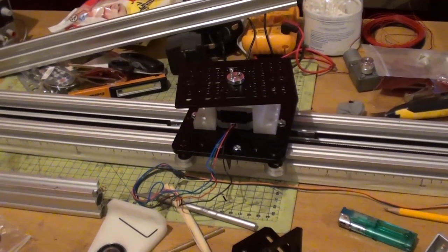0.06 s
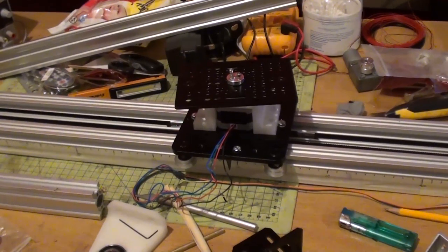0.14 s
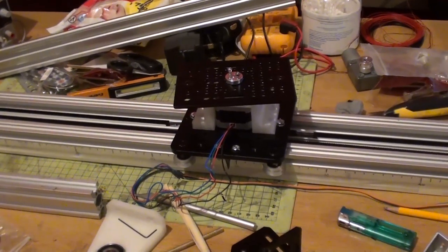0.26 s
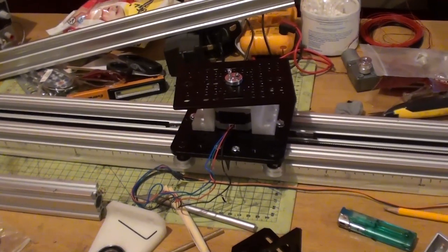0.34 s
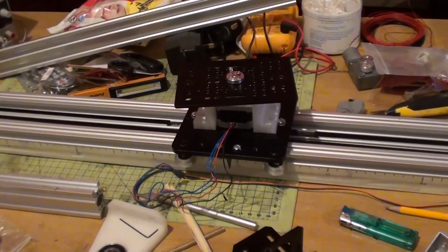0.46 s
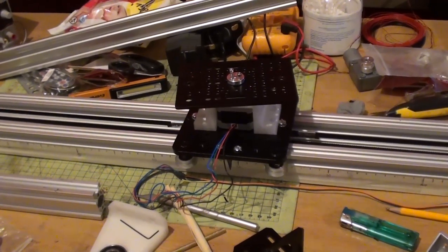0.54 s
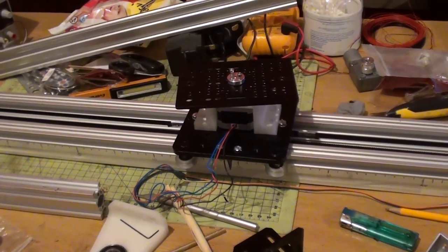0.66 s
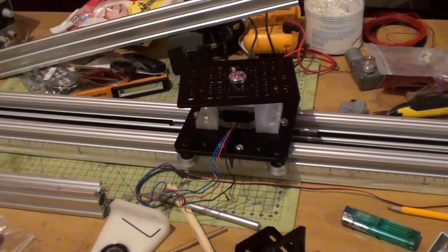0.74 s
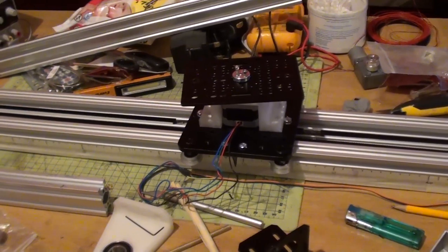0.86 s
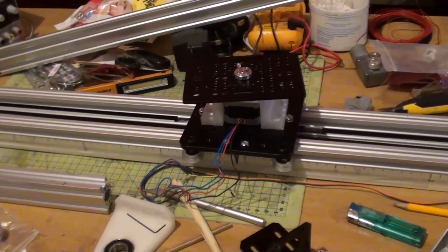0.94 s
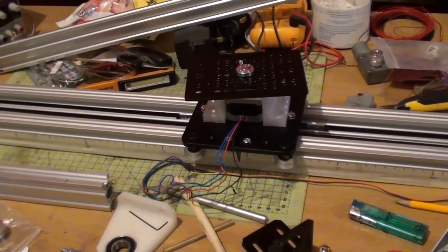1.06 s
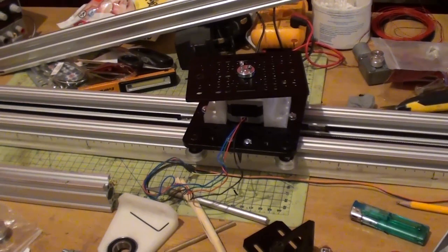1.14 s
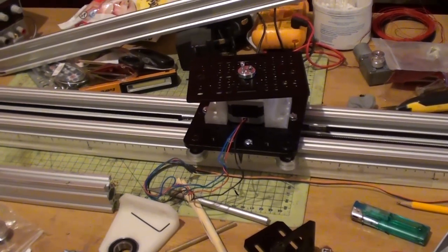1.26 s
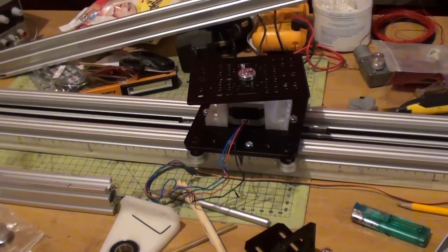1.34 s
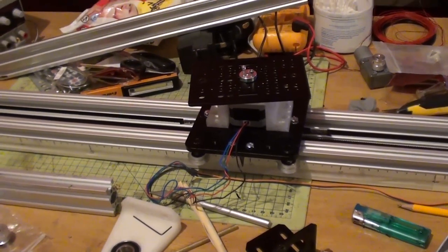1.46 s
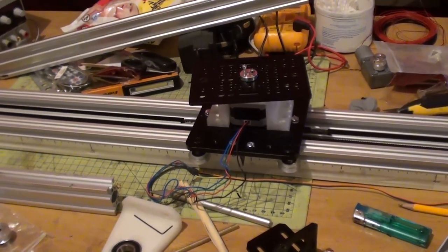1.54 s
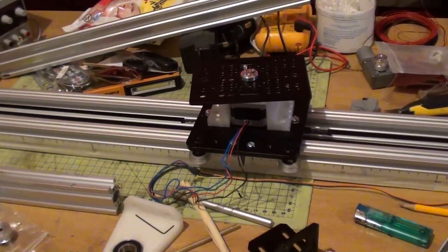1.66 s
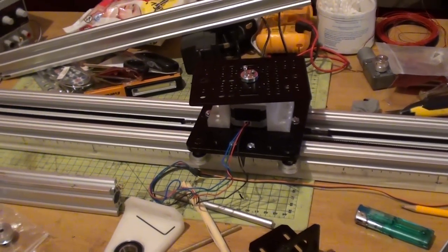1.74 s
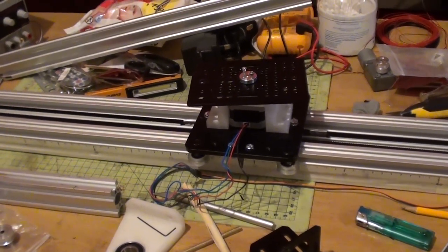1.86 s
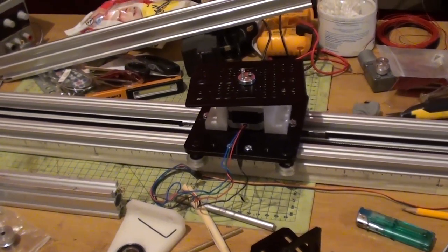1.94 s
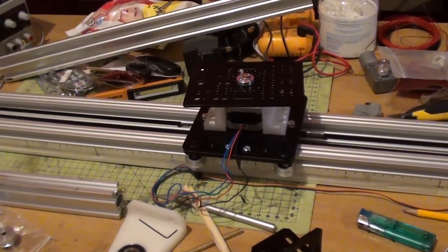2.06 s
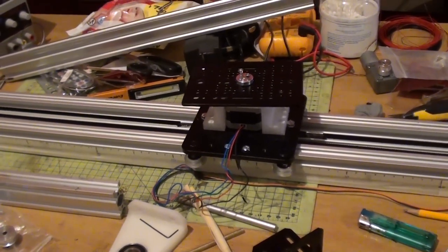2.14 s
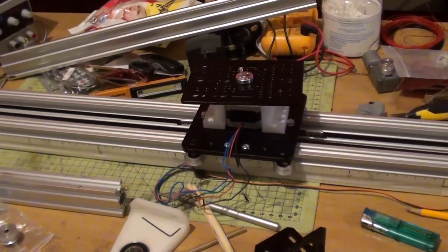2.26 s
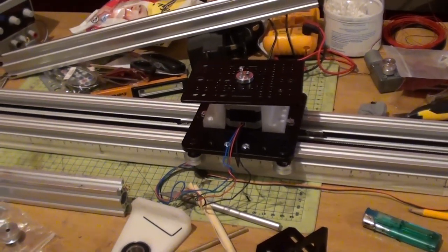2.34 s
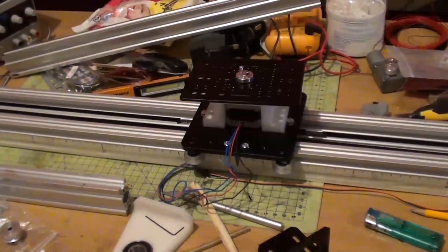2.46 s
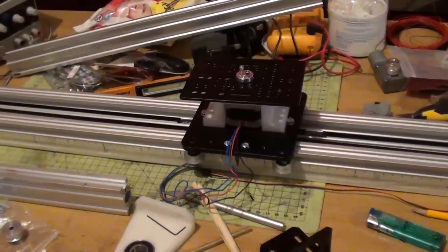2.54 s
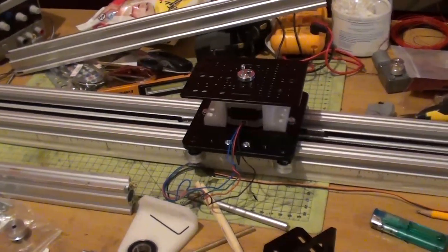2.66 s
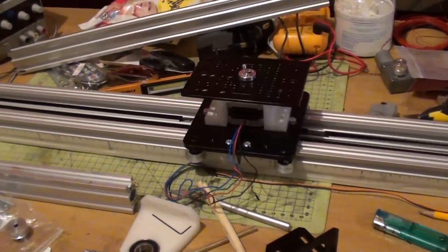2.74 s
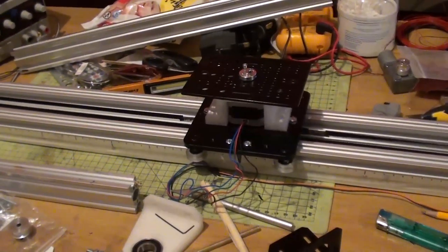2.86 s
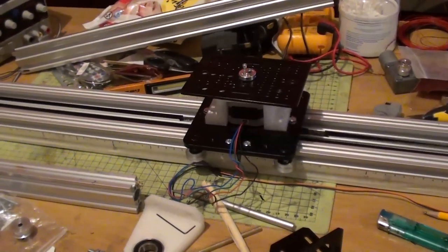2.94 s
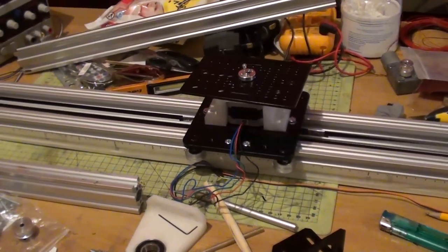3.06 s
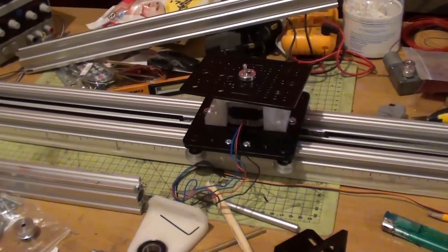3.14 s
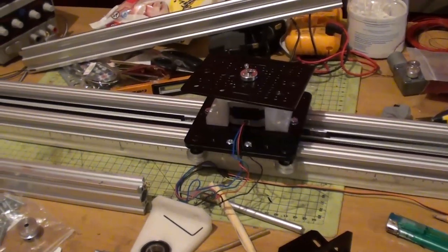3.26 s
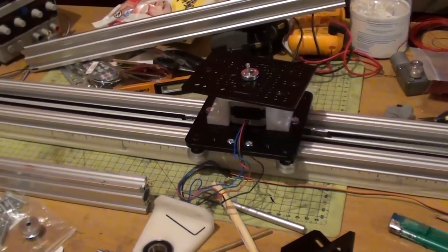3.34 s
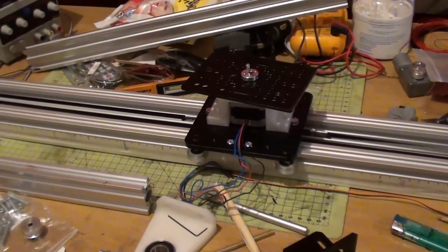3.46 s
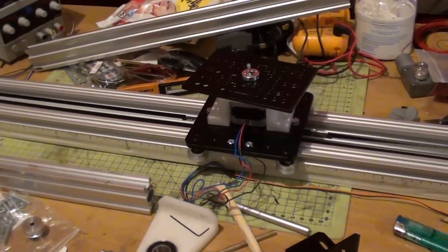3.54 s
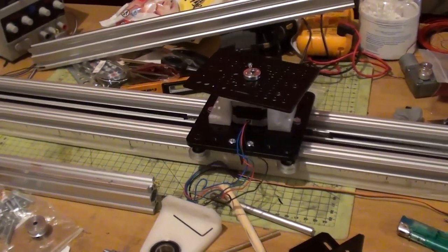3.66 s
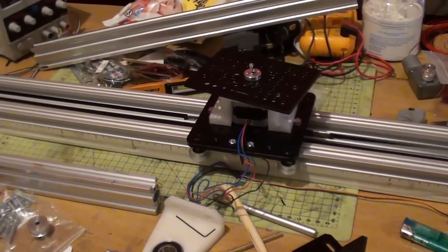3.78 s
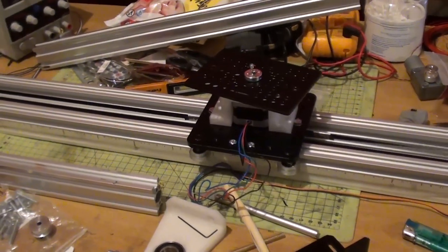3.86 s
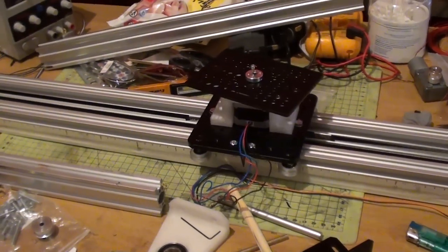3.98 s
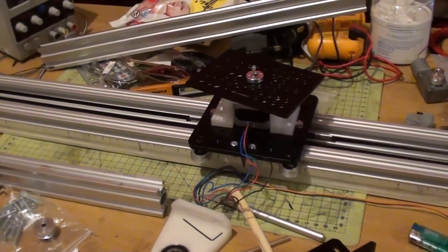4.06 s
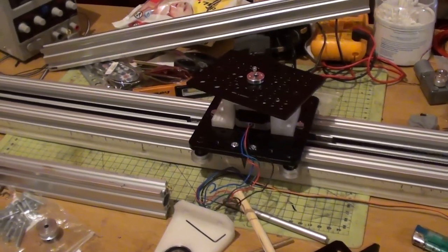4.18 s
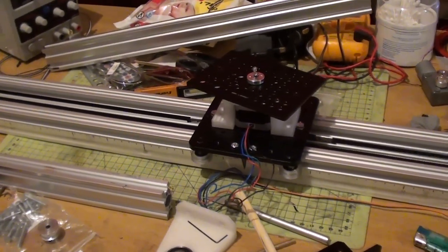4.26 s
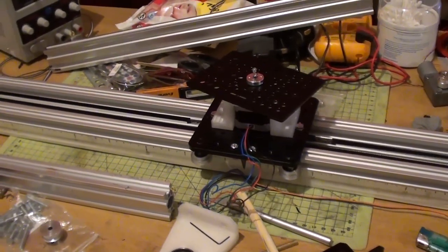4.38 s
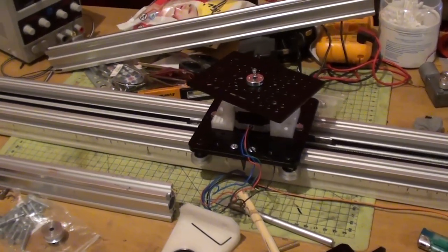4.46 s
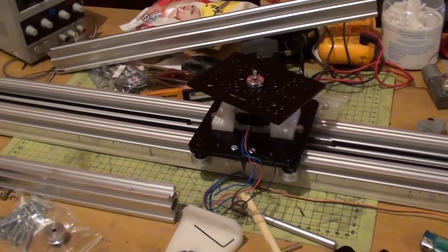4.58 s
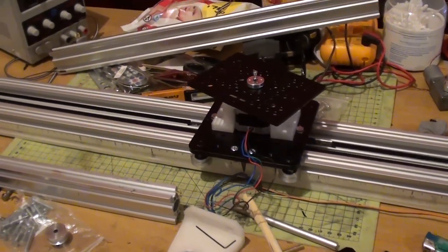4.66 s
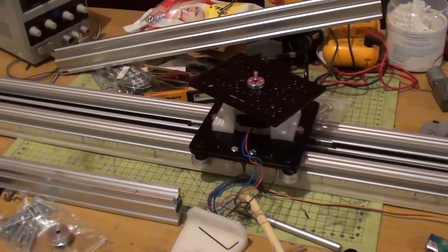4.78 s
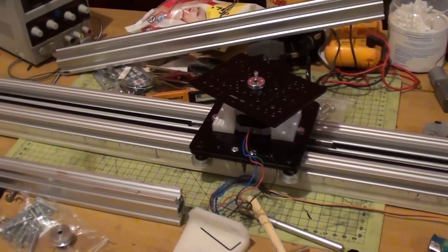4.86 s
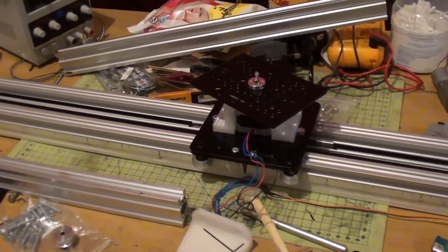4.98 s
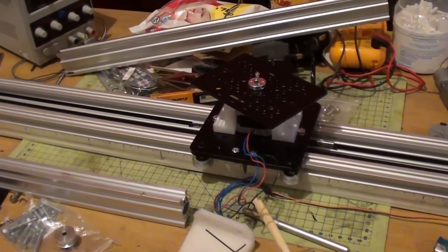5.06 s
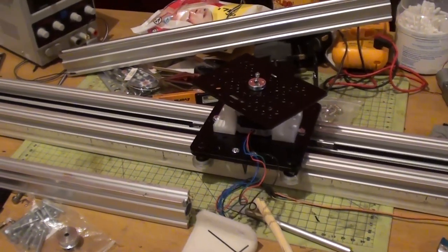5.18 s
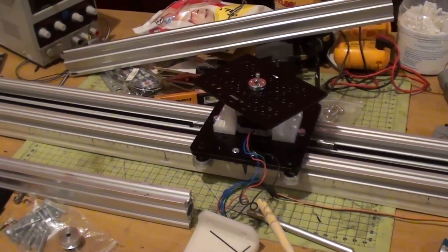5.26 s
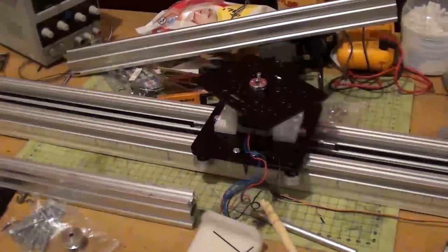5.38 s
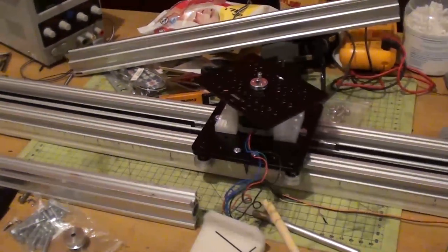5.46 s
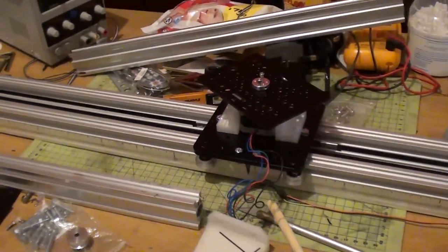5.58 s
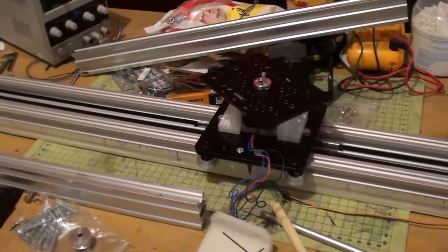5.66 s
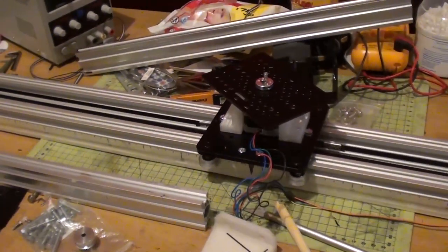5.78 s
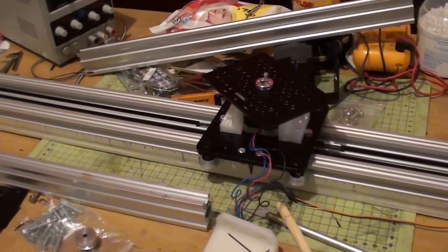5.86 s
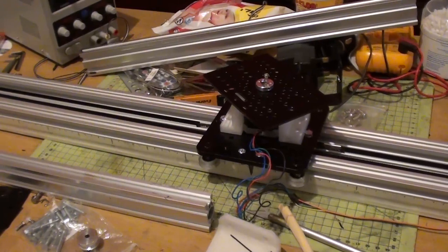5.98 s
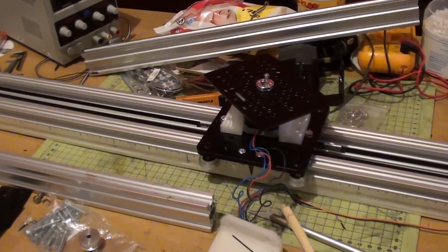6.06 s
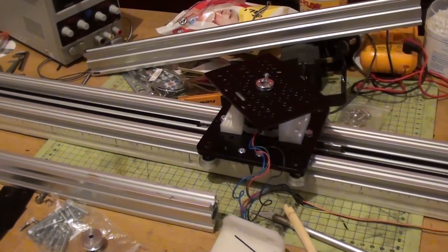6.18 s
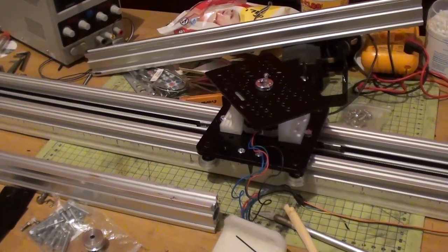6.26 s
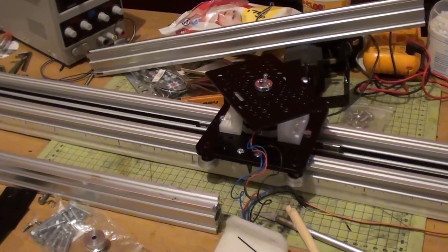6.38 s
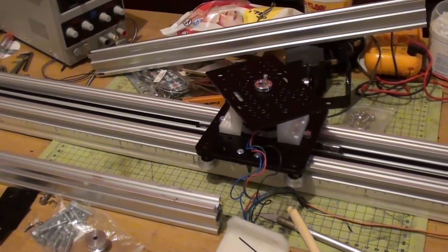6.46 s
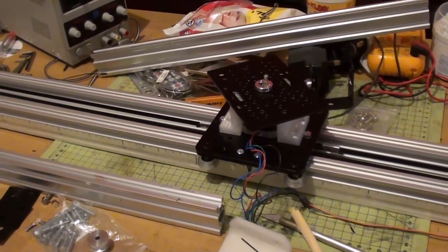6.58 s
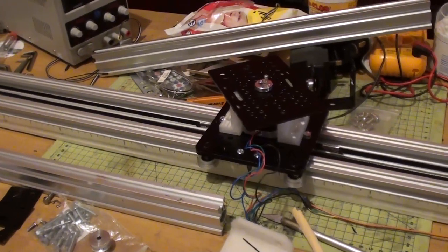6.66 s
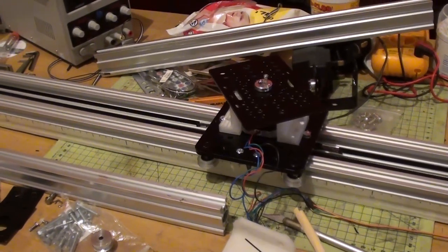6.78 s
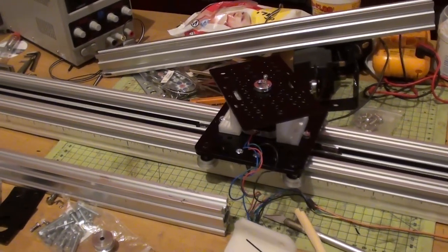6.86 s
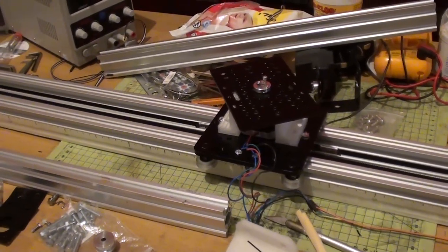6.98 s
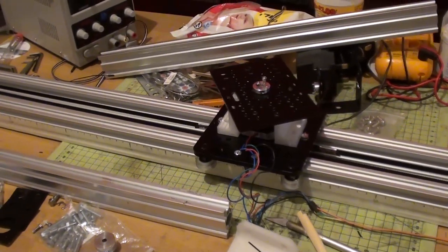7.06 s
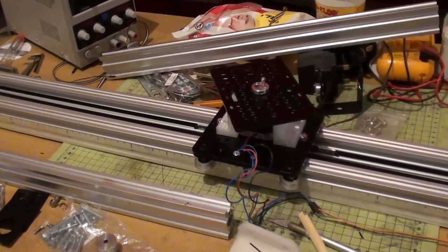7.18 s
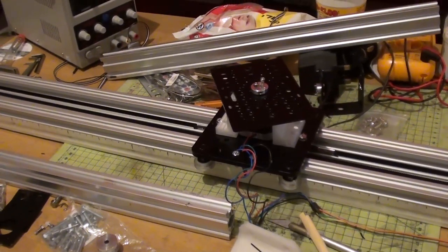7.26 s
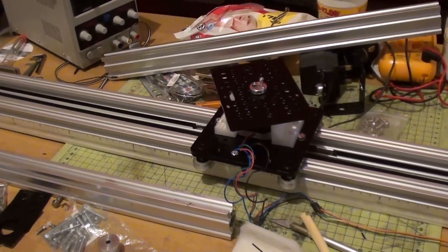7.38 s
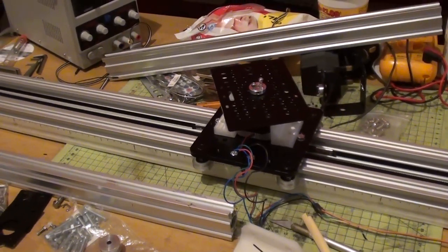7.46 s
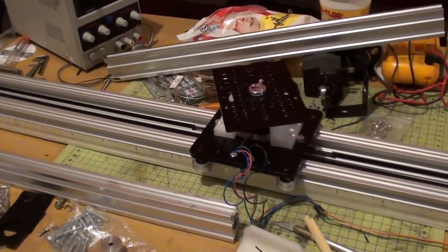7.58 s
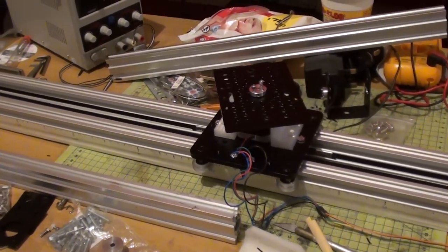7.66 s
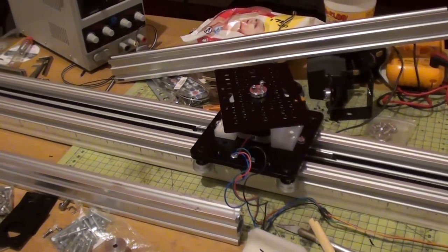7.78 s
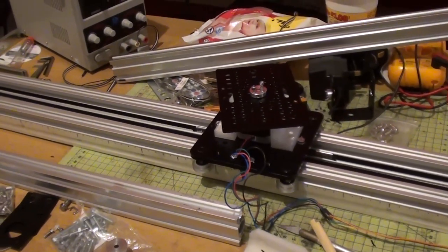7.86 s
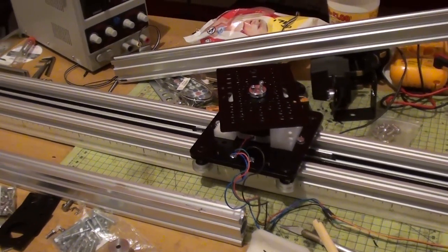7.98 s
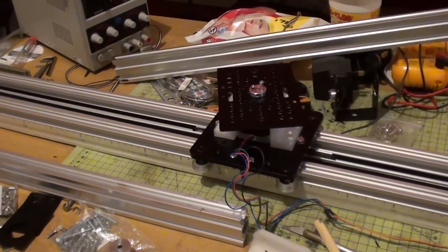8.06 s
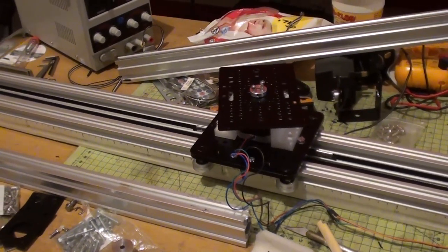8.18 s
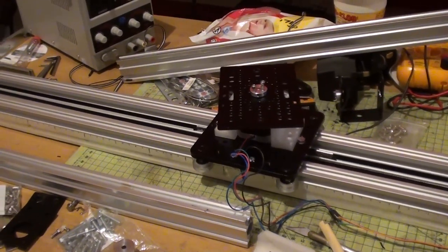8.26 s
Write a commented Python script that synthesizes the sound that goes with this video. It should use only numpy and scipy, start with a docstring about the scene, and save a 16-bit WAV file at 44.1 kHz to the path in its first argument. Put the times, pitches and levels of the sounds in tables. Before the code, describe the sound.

Soft room hush with a few barely audible taps, then two motor clicks ring briefly. Separate motor steps accelerate in half a second and merge into a constant layered buzz over wheel and belt noise. Midway a rubbing plate chatters like a fast rattle, with hardening ticks and high squeals, then lets go. Steady whining and quick faint squeaks remain, captured by a close stereo microphone with only slight bright reflections.

```python
"""A stepper-driven camera carriage on aluminium rails, heard from close by over a workbench.
The coils click on, then separate steps excite the frame's resonances and merge into a steady whine,
a sum of overtones of the coil cycle above filtered noise of wheels, belt and driver.
For a while the turning top plate chatters, hums and squeals: motor-locked impulses ring its modes.
After that a dry bearing chirps lightly; faint reflections and the hush of the workshop surround it."""
import sys
import numpy as np
from scipy import signal
from scipy.fft import rfft, irfft
from scipy.io import wavfile

SR = 44100
rng = np.random.default_rng(int(sys.argv[2]) if len(sys.argv) > 2 else 0)


def master_out(mix):
    """Clip the mix to full scale and print it as 16-bit PCM to the path in sys.argv[1]."""
    frames = np.transpose(np.atleast_2d(mix))
    ceiling = np.clip(frames, -1, 1)
    pcm = np.round(ceiling * 32767).astype(np.int16)
    wavfile.write(sys.argv[1], SR, pcm)


N = 366912
T = np.arange(N) / SR
FREQS = np.fft.rfftfreq(N, 1 / SR)

CYCLE_HZ, STEPS_PER_CYCLE = 77.795, 16  # coil cycle at cruising speed
# the motor starts at a slow step rate and speeds up evenly until it cruises
START_S, START_HZ, ACCEL_HZ_PER_S = 1.522, 129.95, 2455
MERGED_S = 2.06  # the separate steps have merged into the whine
# the turning plate catches on its support, tips over to its other side and comes free
CATCH_S, TIP_S, FREE_S = 2.902, 4.06, 4.39


def undb(db):
    """Level law: decibels to amplitude gain."""
    return 10 ** (np.asarray(db) / 20)


def unit(x):
    """Power normalisation: scale to rms 1."""
    return x / np.sqrt(np.mean(x ** 2))


def hold(start, attack, stop, release):
    """Linear envelope: rises to 1 after the start, holds, and has fallen to 0 at the stop."""
    return np.clip((T - start) / attack, 0, 1) * np.clip((stop - T) / release, 0, 1)


def over_pitch(points):
    """Logarithmic frequency scale: points joined by straight lines over log frequency."""
    hz, value = np.transpose(points)
    return np.interp(np.log(FREQS + 1), np.log(hz), value)


def colour(x, points):
    """Minimum-phase filtering: the folded cepstrum makes a causal filter of the given spectrum."""
    cepstrum = irfft(np.log(undb(over_pitch(points))), N)
    cepstrum[1:N // 2] *= 2
    cepstrum[N // 2 + 1:] = 0
    return irfft(rfft(x) * np.exp(rfft(cepstrum)), N)


def ring(x, modes):
    """Modal superposition: damped resonances in parallel, neighbours swinging in opposite senses."""
    s = 1j * FREQS
    body = 0
    for k, (hz, width, db) in enumerate(modes):
        resonance = width * s / (s * s + width * s + hz * hz)
        body = body + (-1) ** k * undb(db) * resonance
    return irfft(rfft(x) * body, N)


def noise():
    """White noise: equal power at every frequency."""
    return rng.standard_normal(N)


def walk(rate):
    """Low-passed noise: a smooth random fluctuation of rms 1, faster for a higher rate in Hz."""
    return unit(irfft(rfft(noise()) * np.exp(-(FREQS / rate) ** 2), N))


def strikes(times, sizes):
    """Impulse excitation: each impulse is shared between the two samples around its time."""
    out = np.zeros(N)
    at = np.clip(np.asarray(times) * SR, 0, N - 2)
    np.add.at(out, at.astype(int), sizes * (1 - at % 1))
    np.add.at(out, at.astype(int) + 1, sizes * (at % 1))
    return out


def bursts(x, t60):
    """Exponential decay: each impulse sets off a puff of noise that falls 60 dB in t60 seconds."""
    keep = np.exp(-2 * np.log(1000) / (t60 * SR))
    power = signal.lfilter([1 - keep], [1, -keep], x ** 2)
    return noise() * np.sqrt(power)


def bounces(pattern_db, start, jitter, scatter_db):
    """Periodic forcing: contacts locked to the motor, in a pattern spanning two coil cycles."""
    count = np.arange(120 * len(pattern_db))
    times = start + count * 2 / CYCLE_HZ / len(pattern_db)
    late, louder = rng.uniform(-1.1, 1, (len(count), 2)).T
    levels_db = np.resize(pattern_db, len(count)) + scatter_db * louder
    return strikes(times + jitter * late, undb(levels_db))


# resonances of the carriage and rails: f/Hz, width/Hz, relative level/dB
FRAME_MODES = [(201.4, 10.5, 0), (252, 22, -3), (331.7, 8.3, 1), (395, 11, 3), (484, 10.5, 5.5),
               (637, 14, -3.5), (720, 33, -2.5), (754, 16, -1.5), (841, 39, -5), (1039, 10, 8),
               (1301, 6.2, 6), (1450, 37, -13), (1530, 17, -6), (1630, 67, -8), (1726, 32, -6),
               (1957, 9.6, -12.5), (2744, 12.4, -11), (2976, 22, -16.5), (4220, 88, -32), (7400, 240, -46)]


def spin_up(step_hz, steps, uneven=0.28, scatter_db=2, hunt_steps=0.11, soft_start_db=-4.5, attack_s=.07,
            loss_db_per_octave=0.5, release_s=0.053, step_db=-35, sing_db=-41.5):
    """Forced resonance: steps kick the frame, whose modes flare as the step rate sweeps through them."""
    count = np.arange(1, 700)
    # the rotor hunts about its commanded angle but never turns back
    rotor = np.maximum.accumulate(steps + hunt_steps * walk(74.4) * (steps > 0))
    times = np.interp(count, rotor + .5 * (steps > 0), T)
    pull = 1 + uneven * np.cos(np.pi * count / 2)  # full steps pull harder
    sizes = pull * undb(scatter_db * rng.standard_normal(len(count)))

    soft_db = soft_start_db * np.clip(1 - (T - START_S) / attack_s, 0, 1)
    speed_loss_db = loss_db_per_octave * np.log2(np.maximum(step_hz / START_HZ, 1))
    merging = np.clip((MERGED_S - T) / release_s, 0, 1)
    force = undb(soft_db - speed_loss_db) * merging
    body = ring(strikes(times, sizes) * force, FRAME_MODES)
    # slow steps swing the whole carriage and growl
    growl = colour(body, [(400, 3.5), (520, -1), (700, -5), (2000, -29)])
    body += growl * np.clip((1.7 - T) / 0.15, 0, 1)
    body /= np.std(body[(T > START_S) & (T < MERGED_S)])
    # the motor's own case sings at the step rate, louder with speed
    case = np.sqrt(2) * np.cos(2 * np.pi * rotor) * step_hz / step_hz.max() * merging
    return undb(step_db) * body + undb(sing_db) * case


def whistle_dip(depth_db=-3.5, attack_s=.6, recovered_s=7.04, release_s=2.5):
    """Level modulation in dB: the thin whistle sinks as the plate catches and recovers slowly."""
    return depth_db * hold(CATCH_S, attack_s, recovered_s, release_s)


# overtones of the coil cycle: multiple, level/dB with the plate square to the rail, level/dB turned
OVERTONES = [(1, -69, -69.5), (2, -61.5, -63.5), (4, -56, -59.5), (5, -53, -50), (6, -53.5, -54),
             (7, -61.5, -61.5), (8, -65, -69.5), (9, -43.5, -42), (11, -54, -56.5), (12, -58, -70),
             (13, -45, -43), (14, -55, -50), (17, -53, -57.5), (19, -62, -61.5), (20, -50.5, -46.5),
             (21, -56, -59.5), (22, -51.5, -50.5), (23, -69, -63), (27, -68, -70), (28, -71, -75),
             (31, -65, -62), (33, -98, -58), (35, -62.5, -68.5), (37, -66, -78), (52, -75, -71.5),
             (58, -72, -73)]
# overtones that pass a crest or a trough as the carriage travels:
# multiple, t/s, level there/dB, change before and after/(dB per s)
TRAVEL_OVERTONES = [(3, 4.5, -45.5, -1.1), (10, 3.05, -43.5, -2.5), (15, 8.2, -41, -1.5),
                    (16, 5.2, -43.5, 1.28), (32, 5.1, -53, -3), (42, 3.93, -57.5, -4.5)]
# thin lines at the top of the whine: multiple, level before the dip/dB
THIN_LINES = [(93, -72), (95, -64), (96, -63.5), (98, -76), (100, -75)]


def whine(cycles, waver_db=1.07, flutter_rad=0.035, turning_s=1.83):
    """Fourier synthesis: overtones of the coil cycle, each wavering as the wheels move along the rail."""
    turned = np.clip((T - CATCH_S) / turning_s, 0, 1)
    lines = [(round(k), square + (turned_db - square) * turned) for k, square, turned_db in OVERTONES]
    lines += [(round(k), db + slope * np.abs(T - s)) for k, s, db, slope in TRAVEL_OVERTONES]
    dip = whistle_dip()
    lines += [(k, db + dip) for k, db in THIN_LINES]

    waver, flutter, out = waver_db * walk(1.7), flutter_rad * walk(16), 0
    for k, db in lines:
        # a random time shift gives every line its own wavering
        shift, angle = rng.integers(N), rng.uniform(0, 2 * np.pi)
        phase = 2 * np.pi * k * cycles + angle + np.roll(flutter, shift)
        out = out + undb(db + np.roll(waver, shift)) * np.cos(phase)
    return np.sqrt(2) * out * np.clip((T - 1.96) / 0.11, 0, 1)


# spectrum of wheels and belt: f/Hz, relative level per Hz/dB
ROLL_SPECTRUM = [(40, -20), (80, -21.5), (130, -10), (200, -2), (400, 1), (550, -0.5), (720, 1), (1100, 0),
                 (1600, -1.5), (2000, -8), (3200, -16), (5500, -19), (8200, -19.5), (11000, -23),
                 (16000, -45)]
# spectrum of the driver's whistle: f/Hz, relative level per Hz/dB
WHISTLE_SPECTRUM = [(5500, -35), (6800, -12.5), (7150, -7.5), (7400, -0.5), (7700, -10), (8400, -13.5),
                    (12000, -50)]


def rolling(cycles, roll_db=-47, whistle_db=-59.0, sag_hz=380, recover_s=.9):
    """Filtered noise: wheels and belt rumble; a throbbing whistle is flat just after the plate frees."""
    wheels = unit(colour(noise(), ROLL_SPECTRUM)) * undb(roll_db + 0.5 * walk(12))
    throb = 1 + .6 * np.cos(2 * np.pi * cycles)  # once a coil cycle
    # single-sideband shift moves the whole band down in frequency
    flat_hz = sag_hz * np.exp(-np.abs(T - FREE_S) / recover_s) * (T > FREE_S)
    band = signal.hilbert(colour(noise(), WHISTLE_SPECTRUM))
    whistle = np.real(band * np.exp(-2j * np.pi * np.cumsum(flat_hz) / SR))
    whistle = unit(whistle) * throb * undb(whistle_db + whistle_dip())
    # both last to the end: the stop at 9 s lies beyond it
    return wheels * hold(START_S, 0.38, 9, 0.38) + whistle * hold(START_S, 0.009, 9, 0.009)


# how hard the plate knocks: t/s, relative level/dB
KNOCK_LEVELS = [(2.85, -45), (2.922, -44), (3.38, -43), (3.388, -39), (4.058, -38), (4.11, -45.5),
                (4.348, -41), (4.41, -45)]


def knock_level():
    """Linear interpolation in dB: the strength of the plate's knocking through time."""
    return np.interp(T, *np.transpose(KNOCK_LEVELS))


# resonances of the plate: f/Hz, width/Hz, relative level/dB
PLATE_MODES = [(150, 90, -5.5), (283, 85, -7), (440, 75, 4), (686.6, 31, 4.5), (818, 58, 4),
               (1034, 50, 2.5), (1180, 130, -4.5), (1515, 21, 2.5), (1689, 58, -9.5), (2046, 234, -9),
               (2470, 310, -18)]


def knocking(knock_db=4, loose_db=-50, settle_s=0.48):
    """Impact excitation: motor-locked knocks ring the plate, which rattles faintly and settles once free."""
    knocks = bounces([0, -2, -9, -10, -1, -6, -10, -8], 1.9770, .0003, 2)
    knocks = knocks + .4 * bursts(knocks, .017)
    # a small plate radiates little bass
    knocks = unit(colour(ring(knocks, PLATE_MODES), [(50, -12), (110, -7.0), (160, -1.5)]))
    caught = undb(knock_db + knock_level()) * hold(2.74, 0.19, FREE_S, .02)
    loose = undb(loose_db) * hold(TIP_S, .1, FREE_S + settle_s, 0.13)
    return knocks * np.maximum(caught, loose)


def rocking(thud_db=11, build_db_per_s=4, rest_hz=340, tipping_hz=420, stiffen_s=0.42,
            tipped_hz=205, tipped_db=6):
    """Contact stiffening: a thud every second coil cycle grows higher and harder, then low once tipped."""
    before, tipped = np.minimum(T - TIP_S, 0), T > TIP_S
    stiffening_hz = rest_hz + (tipping_hz - rest_hz) * np.exp(before / stiffen_s)
    hz = np.where(tipped, tipped_hz, stiffening_hz)
    db = knock_level() + np.where(tipped, tipped_db, thud_db + build_db_per_s * before)

    out, t = np.zeros(N), T[:SR // 10]
    swell = (t / .005) ** 2 * np.exp(2 - 2 * t / .005)  # peaks after 5 ms
    for s in np.arange(CATCH_S, FREE_S, 2 / CYCLE_HZ):
        late_s, louder_db = rng.standard_normal(2) * (.0003, 1.2)
        i = int((s + late_s) * SR)
        out[i:i + len(t)] += undb(db[i] + louder_db) * swell * np.sin(2 * np.pi * hz[i] * t)
    return out


def humming(cycles, hum_db=-43.0, ease_db_per_s=6, lower_db=-10, attack_s=0.1):
    """Forced vibration: the caught plate hums at twice the coil cycle and a fourth below, fading."""
    level_db = hum_db - ease_db_per_s * (T - CATCH_S) + 1.8 * walk(18.2)
    tones = np.sin(4 * np.pi * cycles) + undb(lower_db) * np.sin(3 * np.pi * cycles + walk(16))
    return tones * undb(level_db) * hold(CATCH_S, attack_s, FREE_S, .04)


# spectrum of the ticks: f/Hz, relative level per Hz/dB
TICK_SPECTRUM = [(1500, -27), (2800, 1.5), (4500, -2), (6000, 0.5), (7500, 6), (8600, -1.5), (9800, -2.5),
                 (10800, -2.5), (13000, -18), (16000, -23)]


def ticking(tick_db=-46, rise_db_per_s=10.0, attack_s=0.037, release_s=0.1):
    """Impact noise: the caught plate's metal edge ticks harder and harder until the plate tips."""
    ticks = bounces([0.5, -4.5, -5.5, -5.5], 1.9866, 0.00071, 1.4)
    ticks = unit(colour(bursts(ticks, 0.009) + 1.2 * bursts(ticks, 0.083), TICK_SPECTRUM))
    level_db = tick_db + rise_db_per_s * np.minimum(T - TIP_S, 0)
    return ticks * undb(level_db) * hold(CATCH_S, attack_s, FREE_S, release_s)


# resonances of the rubbing edge: f/Hz, width/Hz, relative level/dB
EDGE_MODES = [(6020, 310, 2), (7930, 330, -2.5), (9330, 330, 0.5), (10030, 280, 0)]


def scraping(graze_db=-63, caught_db=-51, ease_db_per_s=11, attack_s=0.14):
    """Friction noise: the edge grazes once a coil cycle, bites when the plate catches and eases off."""
    scrape = unit(ring(bursts(bounces([0, -1], 1.9840, 0.00027, 2.6), 0.016), EDGE_MODES))
    graze = undb(graze_db) * hold(2.04, 0.035, FREE_S, 0.035)
    bite = undb(caught_db - ease_db_per_s * (T - CATCH_S)) * hold(CATCH_S, attack_s, FREE_S, .05)
    return scrape * np.hypot(graze, bite)


# fits of squealing from the caught plate: start t/s, length t/s, relative level/dB
SQUEAL_FITS = [(3.476, 0.056, -54), (3.59, 0.028, -51), (3.658, 0.114, -54), (3.787, 0.055, -55),
               (3.868, 0.099, -49.5), (4.065, 0.02, -50), (4.095, 0.059, -50), (4.198, 0.044, -49),
               (4.3, 0.042, -51)]


def squeal(pitch_hz=11130, fit_db=3, between_db=-56, flicker_db=3.0, fade_s=.008):
    """Friction-driven oscillation: metal rubbing on metal sings thinly and flares in fits."""
    wandering_hz = pitch_hz + 45 * walk(159)
    tone = np.sqrt(2) * np.sin(2 * np.pi * np.cumsum(wandering_hz) / SR)
    fits = 0
    for s, length, db in SQUEAL_FITS:
        fits = fits + undb(db + fit_db) * hold(s - fade_s / 2, fade_s, s + length + fade_s / 2, fade_s)
    between = undb(between_db) * hold(3.8, .015, FREE_S, .015)
    return tone * np.maximum(fits, between) * undb(flicker_db * walk(57))


# squeaks in one turn of the bearing, the first half-turn the louder:
# half-turn 0 or 1, delay t/s, mean peak level/dB, mean f/Hz, scatter of f/Hz
SQUEAKS = [(0, 0, -53.5, 10030, 120), (0, 0.0053, -54.5, 5530, 200), (1, 0, -55.5, 9500, 400),
           (1, .01, -60.5, 5500, 200)]


def chirps(first_s=4.369, rate_hz=13.603, scatter_db=2.0, length_s=.004, glide_hz_per_s=-25000):
    """Frequency glide: short falling squeaks of a dry bearing, strong and weak by turns."""
    out, chance = np.zeros(N), rng.standard_normal((60, len(SQUEAKS), 2))
    turns = np.arange(first_s, T[-1], 2 / rate_hz)  # two half-turns each
    for turn_s, draws in zip(turns, chance):
        for (half, delay, db, hz, spread_hz), (louder, higher) in zip(SQUEAKS, draws):
            s = turn_s + round(half) / rate_hz + delay
            near = slice(int(s * SR) - SR // 50, int(s * SR) + SR // 40)
            t = T[near] - s - length_s
            # half the glide here, since phase is the integral of frequency
            tone = np.sin(2 * np.pi * t * (hz + spread_hz * higher + glide_hz_per_s * t / 2))
            out[near] += undb(db + scatter_db * louder) * np.exp(-(t / length_s) ** 2) * tone
    return out


# the coils take hold: t/s, relative level/dB, ring relative to that level/dB
CLICKS = [(1.39, -2.5, -0.5), (1.4814, 1, -16)]
# spectrum of the clicks: f/Hz, relative level per Hz/dB
CLICK_SPECTRUM = [(200, -25), (550, 0), (750, 10), (1050, -3), (1500, -15), (2700, -7), (4000, -3),
                  (4800, -4), (6000, 5), (7000, 0), (8100, 10), (9500, -13), (15000, -23)]
# modes of the housing: f/Hz, width/Hz, relative level/dB
HOUSING_MODES = [(7930, 60, 15), (8010, 14, 15)]


def clicks(snap_db=-7):
    """Impulse response: the rotors snap into place and the housing rings."""
    s, db, ring_db = np.transpose(CLICKS)
    snap = strikes(s, undb(db + snap_db))
    crack = colour(0.41 * snap + .5 * bursts(snap, 0.013) + 0.42 * bursts(snap, 0.11), CLICK_SPECTRUM)
    return crack + ring(strikes(s, undb(db + ring_db)), HOUSING_MODES)


# faint taps at the bench: t/s, relative level/dB
TAPS = [(0.383, -15), (.423, -19), (0.5882, -22.5), (0.774, -22)]
# spectrum of the taps: f/Hz, relative level per Hz/dB
TAP_SPECTRUM = [(200, -6), (500, -2), (800, 7.5), (1400, -3), (3000, -4), (6300, 0), (8000, -8),
                (15000, -25)]
# modes of a small metal part: f/Hz, width/Hz, relative level/dB
TINKLE_MODES = [(4450, 16, -3), (5550, 16, -2), (7060, 25, -4)]


def bench_taps(tinkle_s=.7745, tinkle_db=-6):
    """Free vibration: faint taps die away and a small metal part tinkles once before the start."""
    s, db = np.transpose(TAPS)
    taps = colour(bursts(strikes(s, undb(db)), 0.098), TAP_SPECTRUM)
    return taps + ring(strikes([tinkle_s], undb(tinkle_db)), TINKLE_MODES)


# level difference of the two microphones: f/Hz, left minus right level/dB
LEFT_LEAN = [(380, 0.45), (700, -0.1), (1290, 2), (2380, -2.5), (4400, -1.2), (8120, -1.3), (15000, -0.1)]
# phase difference of the two microphones: f/Hz, angle by which left leads/rad
LEFT_LEAD = [(100, 0.057), (700, -0.19), (1290, -0.41), (2500, -0.16), (4000, -0.72), (7240, 0.52),
             (12000, -0.17)]


def two_microphones(rig):
    """Interchannel difference: half of each level and phase difference goes to either side."""
    sides = np.array([[1], [-1]])
    gain = undb(sides * over_pitch(LEFT_LEAN) / 2)
    return irfft(rfft(rig) * gain * np.exp(.5j * sides * over_pitch(LEFT_LEAD)), N)


def smear(x, t60):
    """Diffuse reverberation: convolution with a dense decaying noise tail of unit energy."""
    t = T[:SR // 2]
    tail = rng.standard_normal(len(t)) * np.exp(-np.log(1000) * t / t60)
    return signal.fftconvolve(x, tail / np.linalg.norm(tail))[:N]


def reflections(loose, wall_db=-21):
    """Diffuse reflection: faint bright tails, independent and of different length on each side."""
    treble = colour(loose, [(200, -24), (1200, 4), (3000, 13.0), (6000, 15), (11000, -17)])
    return undb(wall_db) * np.array([smear(treble, 0.75), smear(treble, 0.2)])


# spectrum of the still room: f/Hz, relative level per Hz/dB
ROOM_SPECTRUM = [(25, -23), (70, -3.5), (150, -4), (195, -1.5), (250, -1), (310, -6), (600, -7.5),
                 (1000, -8), (2200, -13.5), (5500, -13.5), (10000, -16.5), (15500, -13)]


def room_hush(room_db=-57, side_db=-19):
    """Partial coherence: steady coloured noise, nearly alike at both microphones."""
    unshared = colour(noise(), ROOM_SPECTRUM)
    unshared = colour(unshared, [(60, 26), (130, 23), (1000, 30), (5000, 25), (12000, -44)])
    side = np.array([[1], [-1]]) * undb(side_db) * unit(unshared)
    return undb(room_db) * (unit(colour(noise(), ROOM_SPECTRUM)) + side)


def scene():
    """Superposition: the rig at two close microphones, faint reflections and the workshop's hush."""
    step_hz = np.clip(ACCEL_HZ_PER_S * (T - START_S), START_HZ, STEPS_PER_CYCLE * CYCLE_HZ) * (T > START_S)
    steps = np.cumsum(step_hz) / SR
    cycles = steps / STEPS_PER_CYCLE
    motor = spin_up(step_hz, steps) + rolling(cycles)
    plate = knocking() + rocking() + humming(cycles) + ticking() + scraping() + squeal()
    loose = motor + plate + chirps() + clicks() + bench_taps()
    # the whine reaches the microphones only directly
    return two_microphones(loose + whine(cycles)) + reflections(loose) + room_hush()


def record(dry, top_hz=15750):
    """Low-pass filtering: the recorder cuts the top steeply."""
    return signal.sosfilt(signal.ellip(10, .1, 80, top_hz, fs=SR, output="sos"), dry)


dry = scene()
out = record(dry)
master_out(out)
```